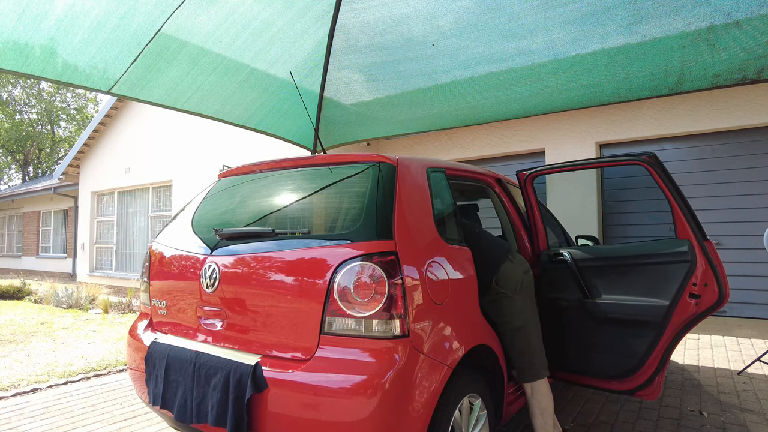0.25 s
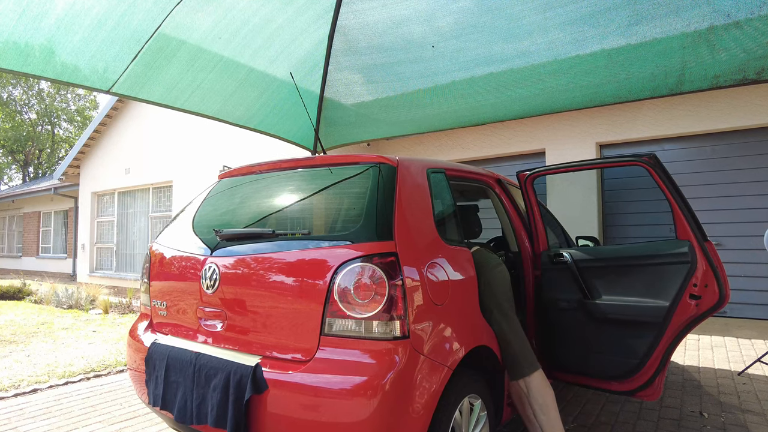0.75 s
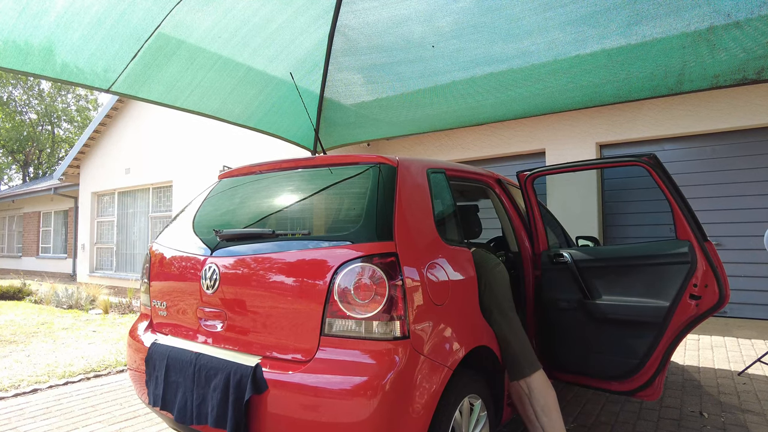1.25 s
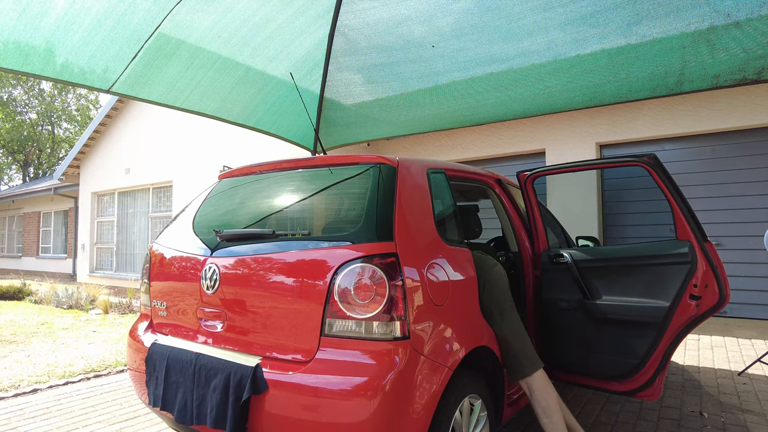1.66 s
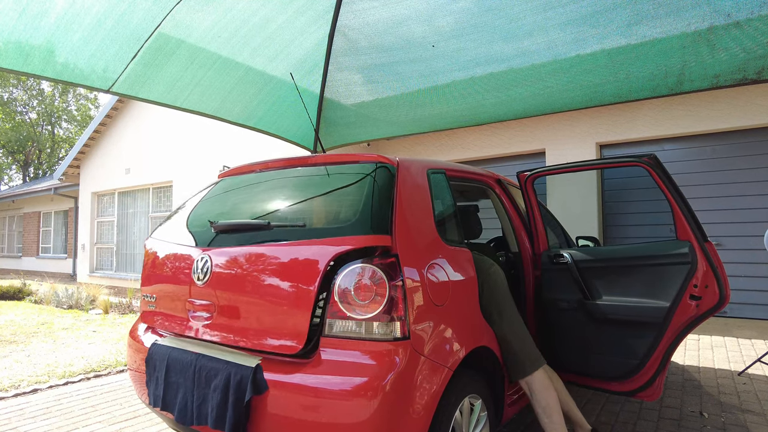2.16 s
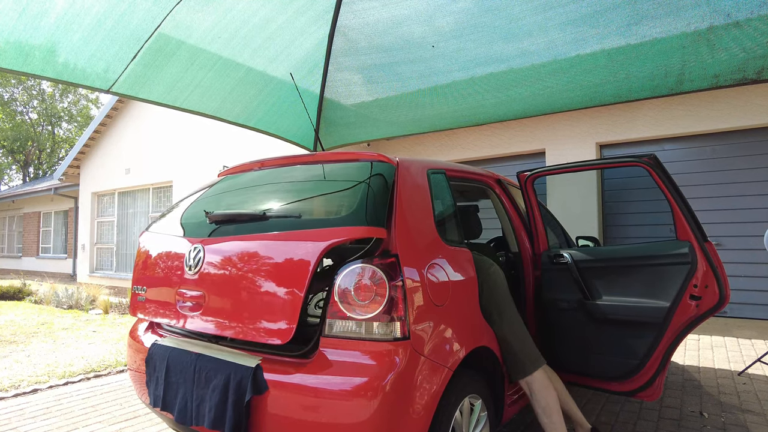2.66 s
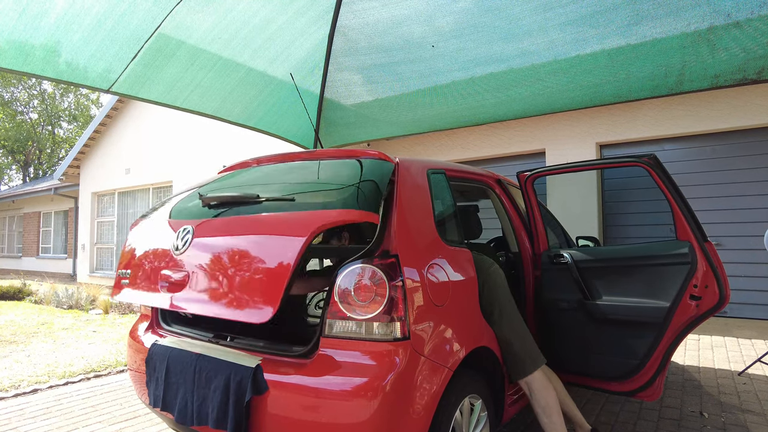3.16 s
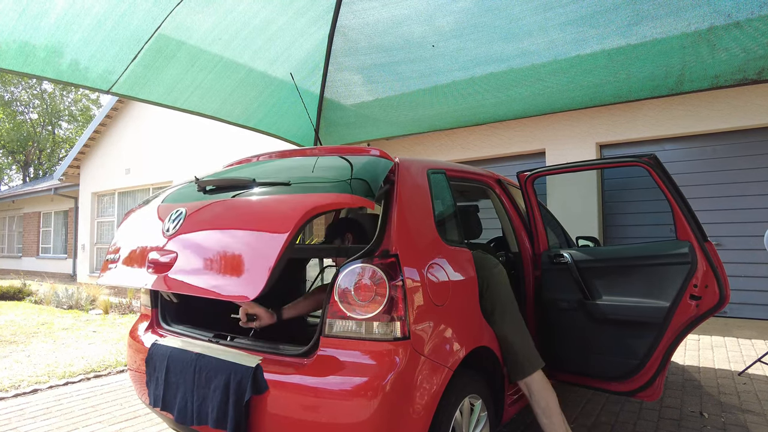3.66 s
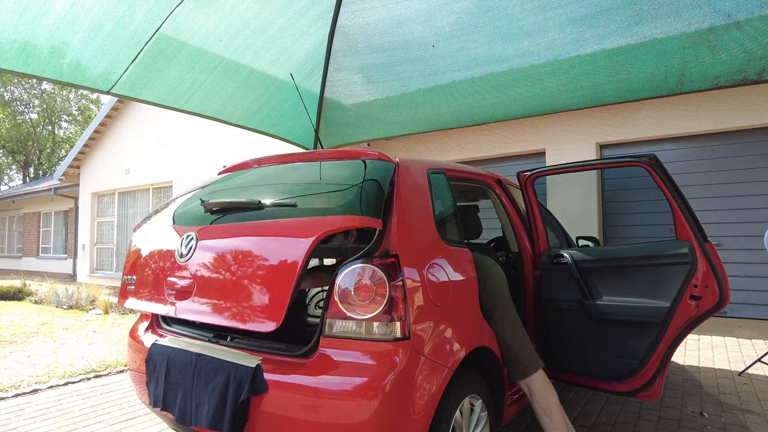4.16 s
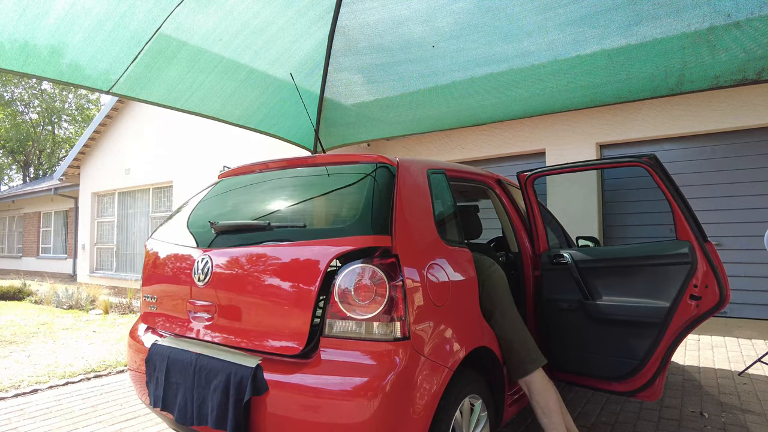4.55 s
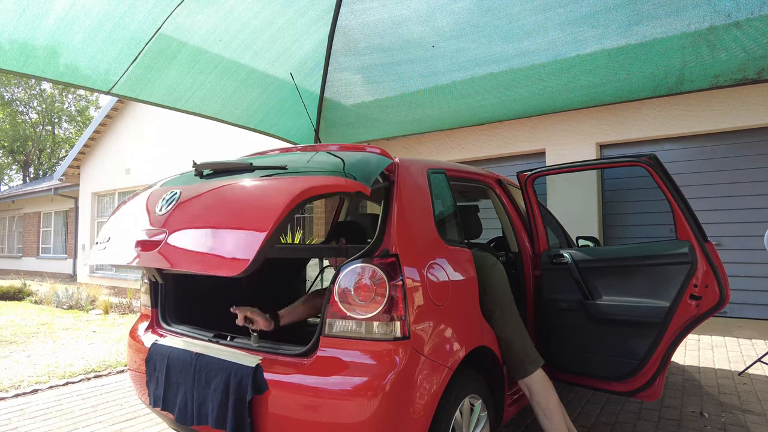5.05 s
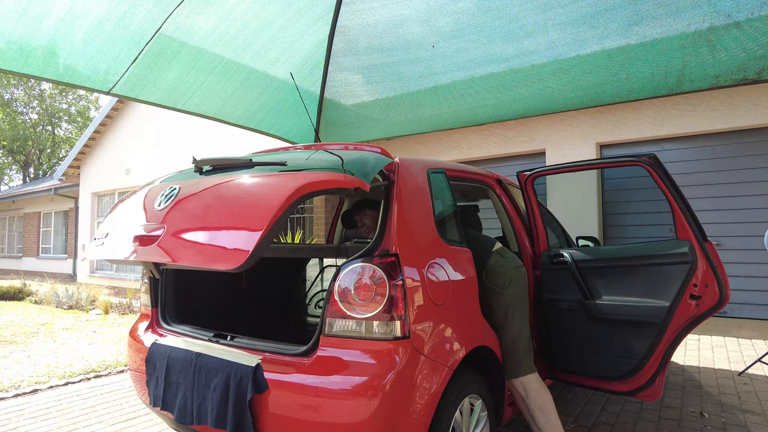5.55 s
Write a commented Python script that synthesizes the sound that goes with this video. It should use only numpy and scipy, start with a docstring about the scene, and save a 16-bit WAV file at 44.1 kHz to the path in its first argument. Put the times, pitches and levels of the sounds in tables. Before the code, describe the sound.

Someone leans into a hatchback in a quiet outdoor yard, the microphone near the boot. Clothes and keys rustle faintly before a heavy, boomy latch clunk with trailing knocks. The lid jerks loose in two quick rattles, the hand rubs the trim, and a hard plastic piece drops and bounces. Sparse clicks, soft taps and low body rumble continue, with a crisp snap and soft bump near the end.

```python
"""A quiet yard under a shade net: a hatchback's boot latch is sprung from inside the car.
The lid clunks as the latch lets go (decaying sines), then rattles free in two jerks (struck modes).
A hand knocks, taps and rubs on the trim, a plastic piece clatters and keys tick: modes and friction noise.
Clothes rustle and the car body rumbles softly as it is leaned on: shaped noise over the yard's hush."""
import sys
import numpy as np
from scipy import signal
from scipy.io import wavfile
from scipy.ndimage import uniform_filter1d

SR = 44100
rng = np.random.default_rng(int(sys.argv[2]) if len(sys.argv) > 2 else 0)


def unload_wav(signal):
    """Save mono or channel-first audio to the path in sys.argv[1] as 16-bit WAV at rate SR, clipped to [-1, 1]."""
    wavfile.write(
        sys.argv[1],
        SR,
        np.round(np.clip(np.atleast_2d(signal).T, -1, 1) * 32767).astype(np.int16),
    )


N = 256220  # samples


def gain_of(db):
    """Decibels to a factor."""
    return 10 ** (np.asarray(db) / 20)


def evened(x):
    """Scales to an rms of 1."""
    return x / np.sqrt(np.mean(x ** 2) + 1e-20)


def peaked(x):
    """Scales to a peak of 1."""
    return x / (abs(x).max() + 1e-20)


def swell_in(t, rise_ms):
    """A soft onset that approaches 1 exponentially."""
    return 1 - np.exp(-t * 1000 / rise_ms)


def read(points, hz):
    """Reads a table along log frequency."""
    f, value = np.transpose(points)
    return np.interp(np.log(hz + 1), np.log(f + 1), value)


def follow(table):
    """Level columns as gains, sample by sample."""
    s, *levels = np.transpose(table)
    return [gain_of(np.interp(np.arange(N) / SR, s, level)) for level in levels]


def add(mix, s, sound):
    """Lays a sound into the mix at a time."""
    part = mix[round(s * SR):][:len(sound)]
    part += sound[:len(part)]


def bandpass(edges_hz, x):
    """Keeps one band of a sound."""
    return signal.sosfilt(signal.butter(2, edges_hz, "bandpass", fs=SR, output="sos"), x)


def noise(spectrum, patchy_db, flicker_db, size):
    """Random short-time spectra with drifting patches and a flicker shared by all bins."""
    frames, hz = 4 * N // size + 5, np.fft.rfftfreq(size, 1 / SR)
    real, imag, patches = rng.standard_normal((frames, len(hz), 3)).T
    patches = uniform_filter1d(patches, size=9, axis=0)
    patches = evened(uniform_filter1d(patches, size=9, axis=1))
    flicker = evened(uniform_filter1d(rng.standard_normal(frames), size=3))
    level_db = read(spectrum, hz)[:, None] + patchy_db * patches + flicker_db * flicker
    z = (real + 1j * imag) * gain_of(level_db)
    return evened(signal.istft(z, nperseg=size, noverlap=3 * size // 4)[1][:N])


def ring(modes, factor, t, spread_db):
    """Decaying modes; where the object is struck, drawn at random, decides how strong each one is."""
    hz, db, t60 = np.transpose(modes)[:, :, None]
    place, start = rng.standard_normal(db.shape), rng.random(db.shape)
    decay = gain_of(db + spread_db * place - 60 * t / (factor * t60))
    return (decay * np.sin(2 * np.pi * (hz * t + start))).sum(0)


# haze of close-packed modes: [f/Hz, relative level/dB, t60/s at ring factor 1]
DENSE = [(150.2, 22.5, 0.13), (490, 0, 0.18), (1309, -9, 0.089), (4000, -16.5, 0.094), (7000, -13, 0.078),
         (13960, -22, .05)]


def close_modes(factor, t):
    """Modes too close to tell apart: noise whose colour and decay vary along frequency."""
    hz, when, z = signal.stft(rng.standard_normal(len(t)), SR, nperseg=128)
    f, colour_db, t60 = np.transpose(DENSE)
    colour_db = read(np.transpose([f, colour_db]), hz)[:, None]
    t60 = read(np.transpose([f, t60]), hz)[:, None]
    return signal.istft(z * gain_of(colour_db - 60 * when / (factor * t60)), SR, nperseg=128)[1][:len(t)]


def blow(modes, bands_hz, row, slope_db, haze_db, spread_db):
    """A blow rings clear modes and a haze; heft feeds the lowest band, brightness the upper two."""
    s, peak_db, heft_db, bright_db, rise_ms, factor = row
    levels = peak_db + np.array([0, heft_db, bright_db + slope_db[0], 2 * bright_db + slope_db[1]])
    t = np.arange(2 ** 14) / SR
    rise, out = swell_in(t, rise_ms), 0
    haze = close_modes(factor, t) * rise
    clear = ring(modes, factor, t, spread_db) * rise
    for db, edges, sign in zip(levels, bands_hz, (1, -1, -1, 1)):  # neighbouring bands in opposite polarity
        body = evened(bandpass(edges, clear)) + gain_of(haze_db) * evened(bandpass(edges, haze))
        loudest = uniform_filter1d(body ** 2, size=200).max()  # power of the strongest few ms
        out = out + sign * gain_of(db) * body / np.sqrt(2 * loudest)
    return s, out


# bands of a blow on lid, catch or trim, in the order middle, heft, two bright ones: [low f/Hz, high f/Hz]
PANEL_BANDS_HZ = [(500, 1500), (90, 500), (1500, 4000), (4000, 15000)]
PANEL_SPREAD_DB = 2.5  # scatter of mode strength
# modes of the catch: [f/Hz, relative level/dB, t60/s at ring factor 1]
CATCH = [(202, 6.5, 0.14), (426, -12, 0.063), (762, 0, 0.067), (923, -4, .09), (1168, -7, 0.12),
         (1640, -17, .065), (2154, -15, 0.078), (2340, -17, 0.075), (2880, -16.5, 0.078),
         (3510, -17.5, 0.079), (4670, -15, 0.019), (5060, -27, .08), (6000, -30, 0.078), (7500, -24, 0.067)]
# blows of the release: [t/s, middle-band peak level/dB, heft/dB added below 500 Hz,
#                        brightness/dB gained per band upward, rise/ms, ring factor on the decays]
RELEASE = [(2.287, -59, 10, -1.5, 1.8, .6), (2.296, -55, 16.5, 3, 2.2, 0.73),
           (2.307, -41.5, 3, -1, 2, 0.68), (2.317, -39.5, -10, -4.5, 0.92, 0.66),
           (2.336, -58, 20, -3, 4.7, 0.99), (2.377, -41, -10, 0, 2.5, .5),
           (2.388, -42.5, 5, -3, 0.54, 0.52), (2.401, -63, 3, 4.5, 2.1, 0.88),
           (2.428, -62, 5, -2, 2.9, 0.8)]


def release(mix):
    """The lid tears free of its catch in two rattling jerks."""
    slope_db, haze_db = (2.1, -3), 1  # standing tilt of the two upper bands, haze over the clear modes
    for row in RELEASE:
        add(mix, *blow(CATCH, PANEL_BANDS_HZ, row, slope_db, haze_db, PANEL_SPREAD_DB))


def boom(s, db, hz, t60, rise_ms):
    """A panel pushes the air outward from rest, then swings and dies away."""
    t = np.arange(SR) / SR
    return s, gain_of(db - 60 * t / t60) * swell_in(t, rise_ms) * np.sin(2 * np.pi * hz * t)


CLUNK_S = 1.7855  # the latch lets go
# swings of lid and cabin air: [level/dB before the rise, f/Hz, t60/s, rise/ms]
LID = [(-15, 26, 0.52, 4.7), (-20.5, 58, .33, 3), (-13.5, 127.4, 0.059, 2.1), (-27.5, 265, 0.18, 1.1)]


def clunk(mix):
    """Lid and cabin air swing together as the latch lets go."""
    for swing in LID:
        add(mix, *boom(CLUNK_S, *swing))


# lesser thuds through the body: [t/s, level/dB before the rise, f/Hz, t60/s, rise/ms]
BOOMS = [(1.275, -33.5, 246, .13, 3.3), (1.388, -38.5, 62.3, 0.49, 5.1), (2.098, -34, 29.4, 0.75, 15),
         (2.304, -23, 202, 0.052, 4.2), (2.385, -28.5, 67.2, 0.24, 3.4), (2.384, -39.5, 191, 0.26, 2.7),
         (3.277, -42.5, 181.9, .1, 3), (4.482, -41.5, 171, .08, 3), (5.592, -33, 57.6, 0.11, 3.1),
         (5.738, -15, 40.5, .05, 7.4)]


def thuds(mix):
    """The car body booms with single decaying swings."""
    for row in BOOMS:
        add(mix, *boom(*row))


# modes of lid and trim: [f/Hz, relative level/dB, t60/s at ring factor 1]
PANEL = [(168, 4.5, 0.3), (195, 5, 0.41), (246, 11, 0.44), (355, -3, 0.074), (374, 14, 0.065),
         (647, 12, 0.12), (865, -33, 0.073), (886, 12, 0.061), (1190, -20, 0.1), (1950, -3, 0.035),
         (2324, 0.5, 0.035), (3300, -26, 0.037), (4030, -26, 0.019), (5400, -35, 0.02), (7300, -47, 0.029)]
# knocks on lid and trim: [t/s, middle-band peak level/dB, heft/dB added below 500 Hz,
#                          brightness/dB gained per band upward, rise/ms, ring factor on the decays]
KNOCKS = [(1.273, -45, 7.5, -5.5, 2.4, 0.91), (1.368, -69, 18.5, -17, 10, .7),
          (1.382, -54.5, -9, -3.5, 1, 0.8), (1.426, -66.5, -1, -7, 2.2, .4),
          (1.583, -64.5, 11, 4, 28, 0.77), (1.671, -74, 21.5, 0.5, 4.3, 0.96),
          (1.785, -30, -3, -10.5, 3.3, 0.88), (1.853, -43.5, 9, -18, 0.72, 0.98),
          (1.919, -59, 18, -19, 1.5, 0.97), (2.017, -97, 13, 20.5, 5, 1),
          (2.093, -54.5, 9.5, -7.5, 3.4, 0.89), (3.166, -69.5, 21.5, -15, 3.7, 0.32),
          (3.279, -62.5, 1, 1, 4.5, 0.24), (4.214, -66, 4, -6, 4.4, 0.79), (4.241, -57, -3, -6, 3.8, 0.75),
          (4.309, -69.5, 9.5, -7.5, 3.7, 0.5), (4.48, -81, 27.5, -3, 5.2, .22),
          (4.749, -61.5, 18, 10, 0.26, 0.28), (4.974, -74, 20.5, 6.5, 6.9, 0.84),
          (5.367, -78.5, 22, 14, 9.8, 1), (5.412, -57, 9.5, 3.5, 12, 0.49), (5.531, -81, 27, 12, 1.8, 0.43)]


def knocks(mix):
    """Blows on lid and trim ring the panel modes."""
    slope_db, haze_db = (3, -16.5), 5  # standing tilt of the two upper bands, haze over the clear modes
    for row in KNOCKS:
        add(mix, *blow(PANEL, PANEL_BANDS_HZ, row, slope_db, haze_db, PANEL_SPREAD_DB))


# modes of the plastic piece: [f/Hz, relative level/dB, t60/s at ring factor 1]
PLASTIC = [(264, 0, .17), (511, -16, .09), (657, -12, .09), (797, -7, .1), (1022, -5, .11),
           (1197, -1, .075), (1280, 2, .06), (1531, -10, .07), (1793, -6, .06), (2026, -9, .06),
           (2300, -12, .05), (2550, -7, .045), (3273, -10, .055), (3525, -9, .04), (4032, -19, .05),
           (4312, -9, .035), (4650, -22, .045), (5650, -18, .04), (6440, -18, .045), (6900, -17, .035),
           (7800, -22, .045), (8400, -20, .035)]
# its bands, in the order middle, heft, two bright ones: [low f/Hz, high f/Hz]
PLASTIC_BANDS_HZ = [(720, 1500), (200, 600), (1500, 4000), (4000, 15000)]
# its fall and bounces: [t/s, middle-band peak level/dB, heft/dB added at 200-600 Hz,
#                        brightness/dB gained per band upward, rise/ms, ring factor on the decays]
CLATTER = [(3.468, -24, -9, 0.5, 2.2, 0.64), (3.505, -45.5, 5.5, -14, 3.4, 1),
           (3.514, -46.5, 5, 0, 1.1, 0.37), (3.539, -58, 11, 4.5, 1.1, 0.35),
           (3.561, -37.5, -13, -6.5, 2.3, 0.52), (3.572, -40.5, -13, -9.5, 1.5, 0.81),
           (3.585, -52, -12, -12, 3.4, 0.63), (3.639, -52.5, -6, -18, 2.2, 0.56),
           (3.668, -49.5, -0.5, -3.5, 10, 0.7), (3.688, -52, -10, -12, 5.3, 0.75),
           (3.71, -79.5, 11, 10, 1.5, .72)]


def clatter(mix):
    """A plastic piece falls and bounces, each impact ringing its modes."""
    slope_db, haze_db, spread_db = (2, -9), -3, 1.5  # tilt of the upper bands, haze, scatter of strength
    for row in CLATTER:
        add(mix, *blow(PLASTIC, PLASTIC_BANDS_HZ, row, slope_db, haze_db, spread_db))


def snap(s, db, ms):
    """One inward jerk of air with a rebound on either side."""
    u = (np.arange(400) / SR * 1000 - 3 * ms) / ms
    return s - 3 * ms / 1000, -gain_of(db) * (1 - u ** 2) * np.exp(-u ** 2 / 2)


# dry snaps of a catch, one alone, then a double one on a small thud:
# [t/s at the centre, peak level/dB, width/ms]
SNAPS = [(3.3065, -46, .1), (4.7474, -33, .125), (4.74788, -35, .125), (4.7478, -34, .5)]


def snaps(mix):
    """A catch snaps dryly, each time as a bare pulse of air."""
    for row in SNAPS:
        add(mix, *snap(*row))


def tap(s, db, hz, t60, rise_ms):
    """A fingertip or knee bumps a hollow panel: one note and two weaker neighbours."""
    t = np.arange(8192) / SR
    modes = [(hz, 0, t60), (1.145 * hz, -7.0, 1.1 * t60), (2.1 * hz, -16, 0.67 * t60)]
    note = ring(modes, 0.53, t, 2.7)  # every decay is shortened to 0.53
    return s, gain_of(db) * peaked(note * swell_in(t, rise_ms))


# soft taps on trim: [t/s, peak level/dB, f/Hz, t60/s before shortening, rise/ms]
TAPS = [(0.103, -46, 570, 0.12, 3.7), (0.139, -75, 268, 0.089, 2.6), (0.153, -53.5, 355, 0.067, 4.1),
        (0.41, -54, 325, 0.092, 3), (0.484, -49.5, 561, 0.087, 0.71), (0.633, -58, 267, 0.11, 3.6),
        (4.242, -54, 748, 0.2, 3.7), (5.364, -50.5, 583, 0.14, 3.8)]


def taps(mix):
    """Soft bumps on trim, each with a hollow note."""
    for row in TAPS:
        add(mix, *tap(*row))


def contact(ms, t):
    """A sharp first touch, then micro-impacts that die away."""
    force = rng.standard_normal(len(t)) * np.exp(-t * 1000 / max(ms, .05))
    force[0] += 1.5
    return force


def tick(s, db, hz, ms):
    """A small hard part clicks broadly and rings briefly; the longer it drags, the less it rings."""
    t = np.arange(4096) / SR
    ring_db = -10 - 1.3 * ms  # relative to the click
    body = ring([(hz, ring_db, .019)], 1.0, t, 0.54)
    body[0] += 1  # the broad click
    struck = signal.oaconvolve(body, contact(ms, t[:2048]))[:len(t)]
    return s, gain_of(db) * peaked(bandpass([2300, 12000], struck))


# keys and small hard parts: [t/s, peak level/dB, strongest f/Hz, contact/ms as decay time]
TICKS = [(.132, -72, 2950, 5.5), (.4126, -57, 8240, 11), (.481, -59, 3030, 5.6), (.5234, -48.5, 3800, 20),
         (.5815, -51.5, 2560, 7.8), (.7115, -57, 2600, 45), (.8382, -48, 6050, 9.7), (.896, -53, 2770, 9.5),
         (.9194, -54, 2880, 9.6), (2.4648, -55.5, 4880, 7.5), (2.595, -60.5, 3620, 7.7),
         (2.6928, -62.5, 4730, 4), (2.7474, -56.5, 4530, 10), (2.838, -61, 3860, 2.7),
         (2.8893, -52.5, 6780, 6.2), (3.0515, -64, 5040, 5.1), (3.076, -57, 4930, 2.7),
         (3.207, -59.5, 4440, 7.3), (3.2869, -60, 5250, 5.1), (3.3344, -59, 8750, 7.3),
         (3.3782, -61, 3860, 3), (3.4198, -52, 4920, 6.6), (3.78, -63, 3900, 7.3), (4.1112, -64, 7220, 5),
         (4.5304, -61.5, 4740, 5.1), (4.9565, -57, 2900, 45), (5.248, -53, 2690, 10.3),
         (5.2679, -55, 3240, 2.6), (5.3231, -56, 5210, 12), (5.4994, -58.5, 4700, 3.2),
         (5.5325, -51, 5640, 9), (5.7308, -48, 2470, 7.2), (5.7583, -53, 4620, 3.7)]


def ticks(mix):
    """Keys and small hard parts tick or drag."""
    for row in TICKS:
        add(mix, *tick(*row))


# strokes of the hand over trim: [t/s at full pressure, held/s, level/dB, swell/s and fade/s as time
#                                 constants, grit level/dB relative to the rub]
RUBS = [(.03, 0.11, -70.5, 0.26, 0.08, 0.5), (.6, 0.16, -77, 0.14, 0.32, -24),
        (1.66, 0.14, -68.5, 0.09, 0.092, -17), (2.05, 0.16, -78, .1, 0.29, -6.5),
        (2.746, 0.084, -54.5, 0.017, 0.033, -11.5), (2.92, 0.02, -71, 0.022, 0.04, -29),
        (3.2, 0.092, -65.5, 0.066, 0.051, -13), (3.57, .13, -64, 0.033, 0.024, -11.5),
        (4.21, 0.55, -75, 0.071, .2, -15), (4.86, 0.12, -65.5, 0.053, 0.039, -3),
        (5.04, 0.2, -71, 0.038, 0.042, -24), (5.52, 0.11, -71, 0.093, 0.098, -8.5)]
REST_RUB_DB = -83.5  # the hand never lies quite still


def strokes():
    """Each stroke of the hand swells, holds and fades; firm ones drag grit along."""
    t = np.arange(0, N + 64, 64) / SR
    rub, grit = gain_of(REST_RUB_DB) + 0 * t, 0 * t
    for s, held, db, swell, fade, grit_db in RUBS:
        away = np.maximum((s - t) / swell, (t - s - held) / fade)
        pressure = np.exp(-np.maximum(away, 0))
        rub += gain_of(db) * pressure
        grit += gain_of(db + grit_db) * pressure
    return [np.interp(np.arange(N) / SR, t, level) for level in (rub, grit)]


# spectra of skin on trim and of dragged grit: [f/Hz, relative level/dB per Hz]
RUBBING, GRIT = [(180, -17), (300, 8), (383, -8), (593, 0.5), (995, -6), (1280, -14.5), (2690, -25),
                 (3400, -28), (4420, -53.5), (7480, -120)], [(600, -30.5), (1000, -2.5), (1500, -6), (2400, -7), (2900, -12),
                                  (3600, -33.5), (8000, -120)]


def rubbing():
    """Skin rubs on trim: friction noise under the pressure of the strokes."""
    rub, grit = strokes()
    return rub * noise(RUBBING, 2.5, 1, size=512) + grit * noise(GRIT, 3, 1, size=256)


# modes of the keys: [f/Hz, relative level/dB, t60/s]
KEYS = [(2550, -2, .1), (3000, -3, .08), (3880, -2, .06), (4600, -2, .1), (5000, -1, .08),
        (6640, -5.5, .08), (8540, -7, .068), (9600, -5.5, .03)]


def keys(per_s, spread_db):
    """Keys brush each other at random; each touch scrapes one mode into a short, fuzzy ring."""
    strength = gain_of(spread_db * np.minimum(rng.exponential(1, N), 2))
    touches = strength * (rng.random(N) < per_s / SR)
    which, t, out = rng.integers(0, len(KEYS), N), np.arange(6000) / SR, 0
    for k, mode in enumerate(KEYS):
        note = ring([mode], 1, t, 0) * swell_in(t, 3)
        out = out + signal.oaconvolve(touches * (which == k), note)[:N]
    return evened(out * uniform_filter1d(rng.standard_normal(N), size=150))  # slow noise makes it fuzzy


# spectra of coarse rustle and fine fizz: [f/Hz, relative level/dB per Hz]
RUSTLE, FIZZ = [(1060, -50.5), (1800, -13), (2540, -7), (3230, -9.5), (3640, -10.5), (4340, -10.5),
                (6500, -20.5), (8450, -28), (14300, -120)], [(3240, -44.5), (5500, 1.5), (5900, 3), (9760, 1), (11700, -8), (13100, -5),
                                (15700, -4)]
# movement of the clothes: [t/s, rustle level/dB, fine fizz level/dB]
CLOTH = [(0, -75.5, -77.5), (.252, -71, -72.5), (.33, -80.5, -87), (.4, -76.5, -88), (.48, -69, -64),
         (.72, -71, -80), (.81, -82, -82), (.868, -75, -81), (1.07, -95, -98), (1.76, -86, -86),
         (2.27, -84.5, -88.5), (2.47, -86, -78.5), (2.684, -82, -84.5), (2.764, -69, -71),
         (2.9, -77.5, -92), (3.14, -82, -82), (3.27, -73, -73), (3.45, -81.5, -79.5), (3.53, -62.5, -73.5),
         (3.83, -93, -93.5), (4.07, -89, -97), (4.2, -85, -84), (4.7, -81, -83), (4.9, -73.5, -77),
         (5.01, -83, -73), (5.2, -78, -79.5), (5.45, -74.5, -78), (5.7, -73, -74), (5.81, -71, -73)]


def clothes():
    """Moving cloth as coarse and fine friction noise; also returns how strongly it moves."""
    rustle, fizz = follow(CLOTH)
    return rustle * noise(RUSTLE, 3.5, .6, size=256) + fizz * noise(FIZZ, 3.5, .6, size=256), rustle


# spectra of body sway, cabin drumming and panel rumble: [f/Hz, relative level/dB per Hz]
SWAY, DRUMMING, RUMBLE = [(7.1, -34), (12, 9.5), (30, -3.5), (52, -8), (68, -31.5), (110, -120)], [(26, -23.5), (45, -3), (77, 1), (135, -9.5), (180, -34),
                                        (300, -120)], [(71, -35), (120, -9), (140, 1.5), (189, 3.5),
                                                          (312, -17), (450, -33), (580, -47), (990, -120)]
# leaning on the car: [t/s, body sway level/dB, cabin drumming level/dB, panel rumble level/dB]
LEANING = [(0, -47.5, -70, -75), (.4, -56, -81.5, -72.5), (.686, -80, -77, -79), (.856, -52, -66, -80),
           (1.04, -70, -77.5, -68), (1.288, -60, -74, -63.5), (1.426, -58, -68, -64),
           (1.76, -53.5, -68, -64.5), (1.98, -41, -51, -53.5), (2.196, -58, -48, -63),
           (2.282, -55, -71, -68), (2.4, -43, -56, -48), (2.53, -49.5, -56, -74.5),
           (2.75, -50.5, -55.5, -58.5), (2.97, -46.5, -53.5, -66.5), (3.12, -50, -59, -68.5),
           (3.286, -55, -50, -51), (3.45, -48, -61, -72.5), (3.59, -49.5, -55, -61),
           (3.87, -54.5, -68, -90), (4.05, -58, -71.5, -95.5), (4.25, -57, -62, -62.5),
           (4.39, -47.5, -60.5, -65.5), (4.77, -51.5, -55.5, -63.5), (5.23, -56, -60, -63.5),
           (5.41, -57, -62.5, -85.5), (5.59, -47.5, -65, -65.5), (5.81, -46.5, -62, -82.5)]


def leaning():
    """Weight on the car sways its body, drums the cabin and rumbles the panels: three low noises."""
    sway, drumming, rumble = follow(LEANING)
    low = sway * noise(SWAY, 1.0, 0.68, size=8192)
    low += drumming * noise(DRUMMING, 0.78, 3.3, size=4096)
    return low + rumble * noise(RUMBLE, 0.62, 3.5, size=2048)


def crackle(per_s, spread_db, smooth):
    """Uneven catches of fibre on fibre over smooth sliding, as a factor on friction noise."""
    strength = gain_of(spread_db * np.minimum(rng.exponential(1, N), 3))
    catches = strength * (rng.random(N) < per_s / SR)
    fading = signal.lfilter([1], [1, -np.exp(-1 / (0.00097 * SR))], catches)  # time constant about 1 ms
    return evened(smooth + evened(fading))


def handling():
    """Leaning, rubbing and clothes together; catches break up the friction and cloth shakes the keys."""
    low, friction, (cloth, movement) = leaning(), rubbing(), clothes()
    friction *= crackle(500, 2.2, 2.6)
    cloth *= crackle(570, 2.8, 2.3)
    return low + friction + cloth + gain_of(-8) * movement * keys(67, 2.5)


# spectrum of the yard: [f/Hz, relative level/dB per Hz]
YARD = [(8.8, -25.5), (15, 4), (47, 7), (105, -28), (133, -16.5), (401, -31), (830, -35.5), (906, -27),
        (1490, -49.5), (2050, -38), (3770, -47.5), (6550, -53.5), (15700, -59.5)]
YARD_DB = -62  # rms level


def yard():
    """The hush of the yard: steady noise, mostly deep, with drifting patches."""
    return gain_of(YARD_DB) * noise(YARD, 3.1, .6, size=2048)


def scene():
    """All sources over the hush of the yard."""
    mix = handling() + yard()
    for source in (knocks, release, clatter, clunk, taps, snaps, ticks, thuds):
        source(mix)
    return mix[None]


EDGE_HZ = 15780  # upper band limit


def record(dry):
    """A steep linear-phase low-pass takes off the top of the treble."""
    lowpass = signal.firwin(511, EDGE_HZ, window=("kaiser", 9), fs=SR)
    return signal.oaconvolve(dry, lowpass[None], "same")


dry = scene()
out = record(dry)
unload_wav(out)
```